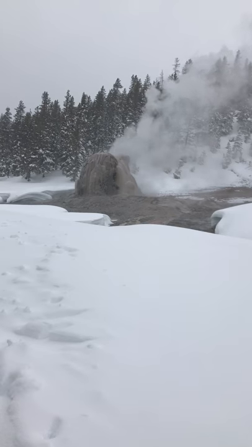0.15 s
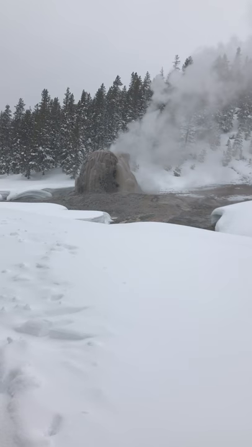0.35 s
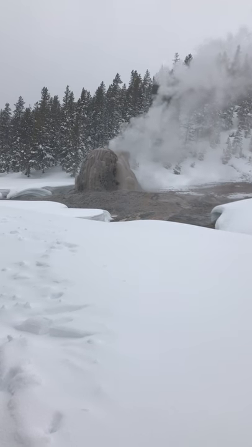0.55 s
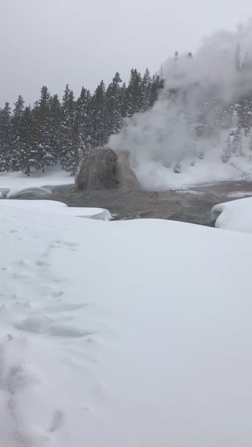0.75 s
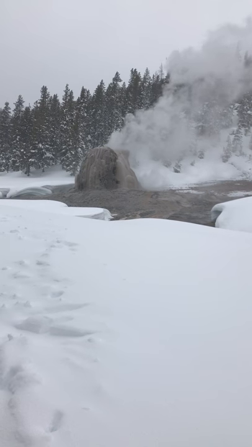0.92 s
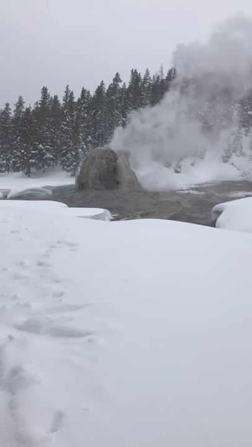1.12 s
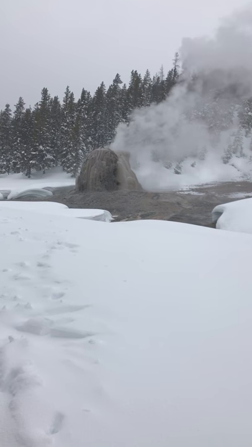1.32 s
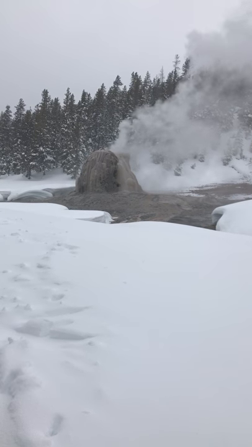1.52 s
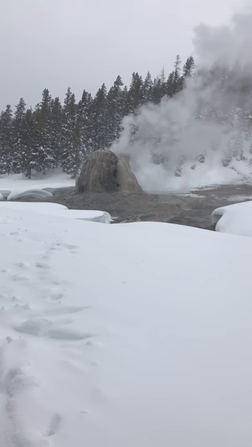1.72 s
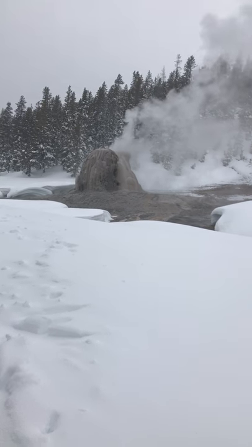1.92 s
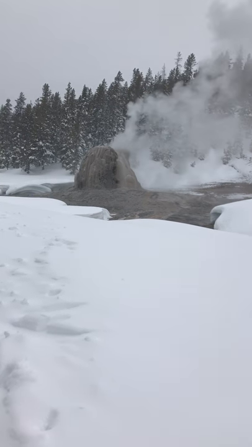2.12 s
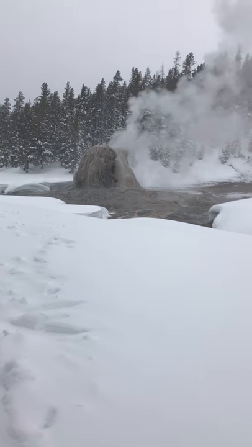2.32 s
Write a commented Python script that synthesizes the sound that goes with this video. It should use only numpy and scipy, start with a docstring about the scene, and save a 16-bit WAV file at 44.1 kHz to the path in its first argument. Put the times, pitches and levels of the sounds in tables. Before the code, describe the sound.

Continuous steam hiss and throaty roar from a geyser cone outdoors, dry and without echo. Droplets patter and snap lightly throughout, while deep wind flutter bumps the handheld microphone early, returns midway, then fades.

```python
"""A geyser cone vents across snow, heard by a phone in the open.
After a short blank a roar rings in the throat resonances, under banded spray noise with a droplet patter.
Wind flutters at the microphone from the start and swells in gusts; louder drops soon snap and ring.
Then sudden buffets kick the membrane into a few slowing swings. The layers run to the end."""
import sys
import numpy as np
from scipy import signal
from scipy.fft import rfft, irfft, next_fast_len
from scipy.io import wavfile
from scipy.ndimage import uniform_filter1d

SR = 44100
rng = np.random.default_rng(int(sys.argv[2]) if len(sys.argv) > 2 else 0)


def invert_db(level):
    """Linear amplitude ratio for a level in decibels (20 dB per decade), elementwise."""
    return 10 ** (np.asarray(level, dtype=float) / 20)


def generate_wav(signal):
    """Clip the signal to [-1, 1] and save it as 16-bit WAV at the path in sys.argv[1]."""
    frames = np.transpose(np.atleast_2d(signal))
    scaled = np.clip(frames, -1, 1) * 32767
    pcm = np.round(scaled).astype(np.int16)
    wavfile.write(sys.argv[1], SR, pcm)


N = 103635  # length in samples


def curve(rows, column=1):
    """Piecewise-linear envelope: one table column interpolated over time."""
    rows = np.array(rows, float)
    return np.interp(np.arange(N) / SR, rows[:, 0], rows[:, column])


def unit(x):
    """Normalisation of signal power: scale to rms 1."""
    return x / np.sqrt(np.mean(x ** 2))


def band(x, hz, width_hz):
    """Second-order resonance with gain 1 at its centre; bandwidth sets the damping."""
    b, a = signal.iirpeak(hz, hz / width_hz, fs=SR)
    return signal.lfilter(b, a, x)


def walk(rate_per_s):
    """Slow random modulation: held random levels smoothed twice, at rms 1."""
    hold = int(SR / rate_per_s)
    steps = np.repeat(rng.standard_normal(256), hold)
    smooth = uniform_filter1d(uniform_filter1d(steps, hold), hold)
    return unit(smooth[:N])


def roar():
    """Resonance of a noise-driven cavity: turbulent steam rings the throat of the cone."""
    # surge of the vent: start_s, level_db (rms)
    surge = [(0.04, -56.5), (.2, -56), (.54, -61), (.62, -52), (.72, -55.5), (.78, -53), (.83, -54),
             (.88, -53), (.96, -53.5), (1.0, -57.5), (1.1, -54.5), (1.18, -59), (1.26, -58.5), (1.5, -60),
             (1.58, -56), (1.8, -54.5), (2.0, -55.5), (2.07, -53), (2.2, -52.5), (2.28, -55), (2.35, -50.5)]
    # throat resonances: centre_hz, nominal_width_hz, relative_level_db
    throat = [(489, 86, -6), (628, 122, -0.5), (948, 236, -1), (1114, 196, -2), (1566, 216, -8)]
    flicker_db, flickers_per_s = 0.5, 25
    puff_db, puffs_per_s = 1.47, 70  # quick bursts of steam through the whole throat
    widening = 1.36  # offsets most of the narrowing by two filters in series

    gas = 0
    for hz, width_hz, db in throat:
        filter_hz = width_hz * widening
        mode = band(rng.standard_normal(N), hz, filter_hz)
        mode = unit(band(mode, hz, filter_hz))
        # each resonance flickers alone
        gas = gas + invert_db(db + flicker_db * walk(flickers_per_s)) * mode
    puffed = gas * invert_db(puff_db * walk(puffs_per_s))
    return unit(puffed) * invert_db(curve(surge))


def spray():
    """Shot noise over a steady hiss: random droplet impulses, shaped in flickering half-octave steps."""
    # flow of spray: start_s, level_before_gain_db
    flow = [(0.04, -53.5), (0.26, -56), (0.28, -54), (0.3, -57), (0.31, -57.5), (0.65, -56), (0.66, -53),
            (0.71, -55.5), (1.15, -55.5), (1.17, -57), (1.63, -54.5), (1.67, -56), (2.3, -54), (2.35, -56)]
    # colour of the spray: frequency_hz, relative_density_db (per Hz)
    colour = np.array([(150, -0.5), (250, 3.5), (360, 1.5), (800, -16), (1400, 0.5), (2200, -1), (3500, -1),
                       (6000, -5), (9500, -7.5), (15800, -15.5)], float)
    gain_db, flicker_db, flickers_per_s = 1.5, 1.0, 20
    shared_flicker_db, shared_flickers_per_s = 0.5, 13.55
    drops_per_s, patter_db = 440, -2.5  # in each band; patter rms relative to hiss
    size_mean_db, size_cap_db = 5.5, 12  # exponential spread of sizes, mean before the cap

    octave = np.log2(np.fft.rfftfreq(N, 1 / SR) + 1)
    tint = invert_db(np.interp(octave, np.log2(colour[:, 0]), colour[:, 1], left=-30))
    shared = shared_flicker_db * walk(shared_flickers_per_s)
    out = 0
    for centre in np.arange(7, 14.6, .5):  # log2 of the centre in Hz
        chance = rng.random((3, N))
        falls = chance[0] < drops_per_s / SR
        size_db = np.minimum(-size_mean_db * np.log(1 - chance[1]), size_cap_db)
        polarity = np.sign(chance[2] - .5)
        patter = unit(falls * invert_db(size_db) * polarity)
        # triangular power shares let neighbouring bands cross over
        share = np.sqrt(np.clip(1 - 2 * abs(octave - centre), 0, 1))
        source = rfft(rng.standard_normal(N) + invert_db(patter_db) * patter)
        level_db = shared + flicker_db * walk(flickers_per_s)
        out = out + invert_db(level_db) * irfft(source * tint * share, N)
    return unit(out) * invert_db(curve(flow) + gain_db)


def eddies(hz, width_hz):
    """Narrow-band turbulence: pressure swings wander in pitch while compression evens their size."""
    evenness = 0.83  # 0 leaves the envelope alone, 1 divides it out
    swings = band(band(rng.standard_normal(N), hz, width_hz), hz, width_hz)
    size = np.abs(signal.hilbert(swings, next_fast_len(N))[:N]) + 1e-9
    return unit(band(swings / size ** evenness, hz, 2 * width_hz))


def wind():
    """Turbulent pressure on a membrane: gusts give a deep flutter and a sharper edge above it."""
    # wind on the microphone: start_s, flutter_level_db (rms), edge_relative_to_flutter_db
    gusts = [(0.04, -66, -11), (0.06, -61, -7), (0.15, -66.5, -2), (0.2, -44, -16), (0.23, -50, -2),
             (0.25, -31.5, -1), (0.28, -40.5, -26), (0.36, -44, -11), (0.41, -31.5, -29), (0.43, -43, 0),
             (0.46, -33.5, -6.5), (0.59, -47, -5), (0.61, -40, -10), (0.64, -41, 2.5), (0.69, -34.5, -9),
             (0.72, -30, -22.5), (0.79, -39, -34), (0.82, -47, -18), (0.88, -39.5, -30), (0.93, -51, -28),
             (0.95, -60, -11), (1.03, -52.5, -17), (1.07, -68, -1), (1.14, -59, -8), (1.18, -52, -9),
             (1.2, -53, -4), (1.27, -49, -17), (1.32, -69, -3), (1.35, -60, -14), (1.41, -72, 1),
             (1.44, -45, -32), (1.5, -37, -24), (1.54, -59, -23), (1.55, -44, -14), (1.6, -49, -39),
             (1.62, -46, -6), (1.65, -39, 0), (1.67, -35.5, -15.5), (1.71, -42.5, -11), (1.75, -62.5, -10),
             (1.87, -57.5, -9), (1.98, -53, -33), (2.03, -63, -12), (2.06, -74, 9), (2.09, -59, -11),
             (2.12, -57.5, 1.5), (2.17, -51, -15.5), (2.26, -80, 4), (2.3, -66, -5), (2.35, -72, 0)]
    flutter = eddies(hz=48.2, width_hz=37.5)
    edge = invert_db(curve(gusts, column=2)) * eddies(hz=98.8, width_hz=51)
    return invert_db(curve(gusts)) * (flutter + edge)


def drops():
    """Impact and damped free vibration: each louder drop is a noise snap and a very short ring."""
    # single louder drops: start_s, ring_start_db, ring_hz
    impacts = [(.126, -38.5, 3800), (.2676, -46, 5230), (0.2824, -33, 5200), (.416, -40.5, 3950),
               (.531, -41, 4300), (.6602, -45, 5460), (.670, -41, 4800), (.938, -48, 9000),
               (1.325, -51, 3700), (1.641, -47, 4700), (1.880, -40.5, 5270), (1.899, -49, 7900),
               (1.997, -44, 3700), (2.208, -41, 4830), (2.234, -44, 3690), (2.266, -41, 4850),
               (2.277, -45, 9000)]
    t60_s = 0.0037
    snap_gain_db, snap_width_share = 8, 0.57  # gain on unit noise ahead of filters; share of ring pitch

    out = np.zeros(N + 400)
    t = np.arange(400) / SR
    fade = np.exp(-np.log(1000) * t / t60_s)
    for start_s, db, hz in impacts:
        width_hz = snap_width_share * hz
        snap = band(band(rng.standard_normal(400), hz, width_hz), hz, width_hz)
        ring = np.sin(2 * np.pi * hz * t)
        i = int(start_s * SR)
        out[i:i + len(t)] += invert_db(db) * fade * (ring + invert_db(snap_gain_db) * snap)
    return out[:N]


def buffets():
    """Transient with falling frequency: a hard puff kicks the membrane into swings that slow down."""
    # sudden buffets: start_s, envelope_peak_db, start_hz
    kicks = [(0.231, -28, 125), (0.643, -33, 198), (1.642, -37, 108.5), (2.125, -49.5, 195)]
    rise_s, fade_s = 0.0014, 0.009  # time constants
    sink_s, end_hz = 0.012, 55.7  # time constant of the pitch fall, and its limit

    out = 0
    for start_s, db, start_hz in kicks:
        t = np.clip(np.arange(N) / SR - start_s, 0, None)
        # integral of a frequency that decays exponentially to end_hz
        turns = end_hz * t + (start_hz - end_hz) * sink_s * (1 - np.exp(-t / sink_s))
        shape = (1 - np.exp(-t / rise_s)) * np.exp(-t / fade_s)
        out = out + invert_db(db) * shape / shape.max() * np.sin(2 * np.pi * turns)
    return out


def scene():
    """Superposition in a free field: the layers add, and snow returns no echo."""
    mix = roar() + spray() + wind() + drops() + buffets()
    return mix[None, :]


def top_cut(x):
    """Nothing passes above the cut-off."""
    return signal.sosfilt(signal.butter(12, 16120, fs=SR, output="sos"), x)


def record(dry):
    """Linear filtering: the microphone loses deep bass, the case dips the treble, the top is cut."""
    # dips of the phone's case: centre_hz, width_hz, depth (0 to 1, no unit)
    case_dips = [(4820, 133, 0.33), (7750, 600, 0.27), (10410, 460, 0.4)]
    mic_low_hz, top_hz, start_s = 33.4, 15770, 0.0342

    x = signal.sosfilt(signal.butter(2, mic_low_hz, "high", fs=SR, output="sos"), dry)
    for hz, width_hz, depth in case_dips:
        x = x - depth * band(x, hz, width_hz)
    x = irfft(rfft(x) * (np.fft.rfftfreq(N, 1 / SR) < top_hz), N)
    mix = x * (np.arange(N) > start_s * SR)  # short blank first
    return top_cut(mix)


dry = scene()
out = record(dry)
generate_wav(out)
```